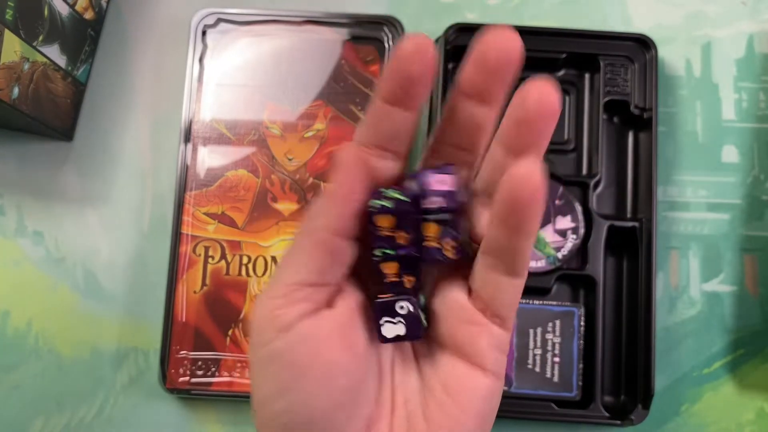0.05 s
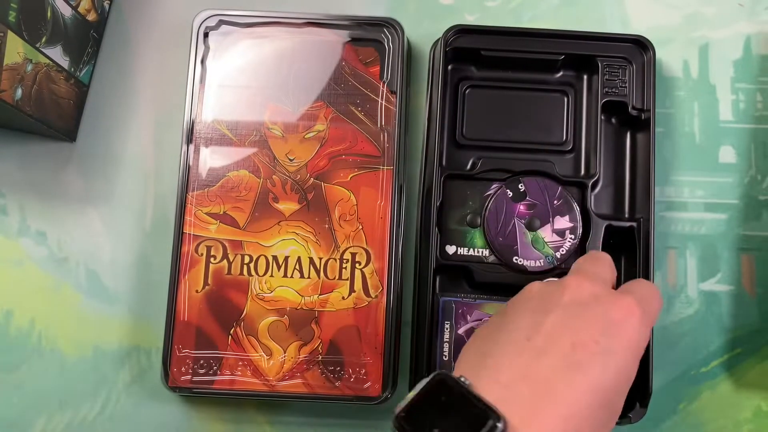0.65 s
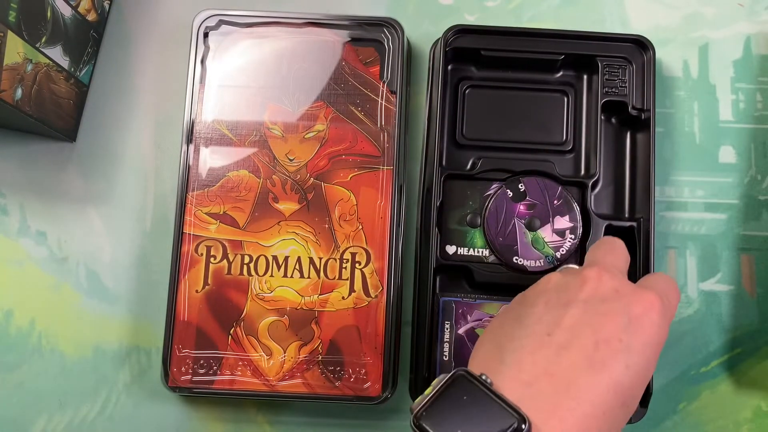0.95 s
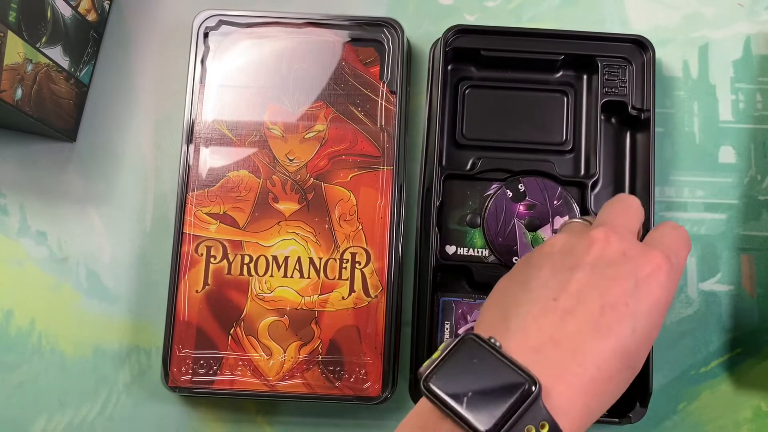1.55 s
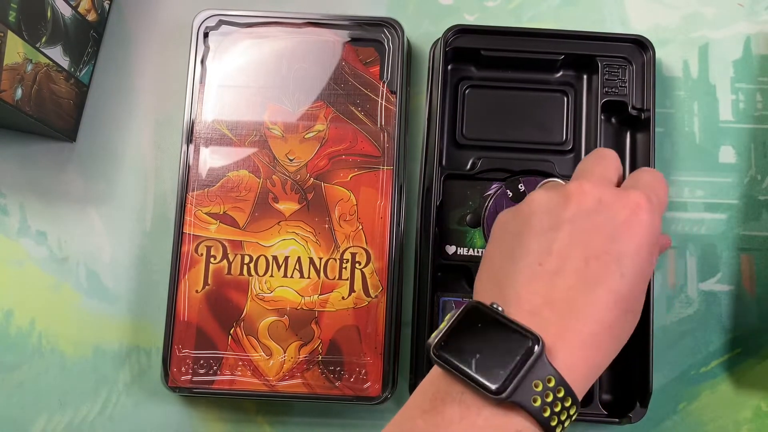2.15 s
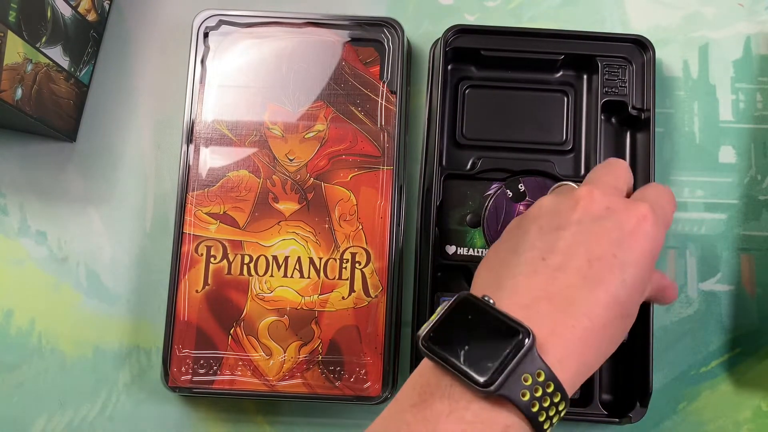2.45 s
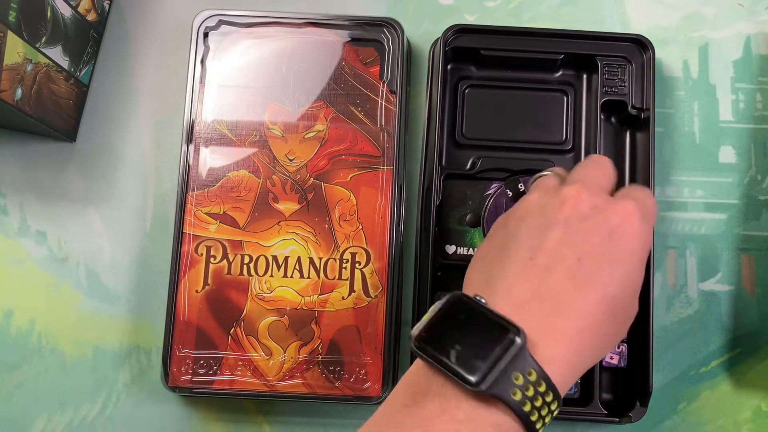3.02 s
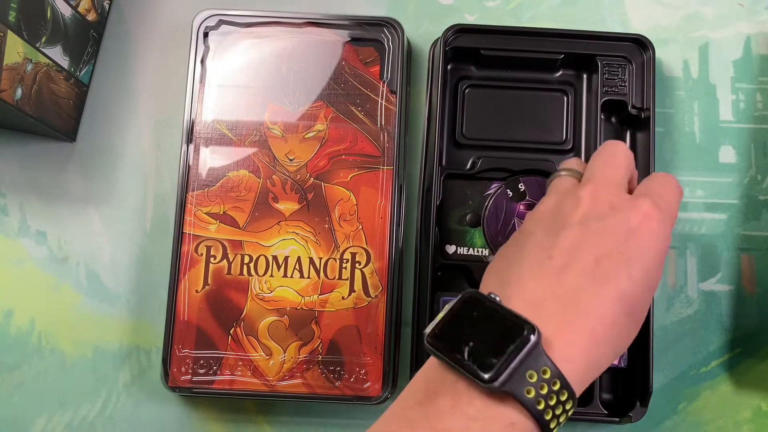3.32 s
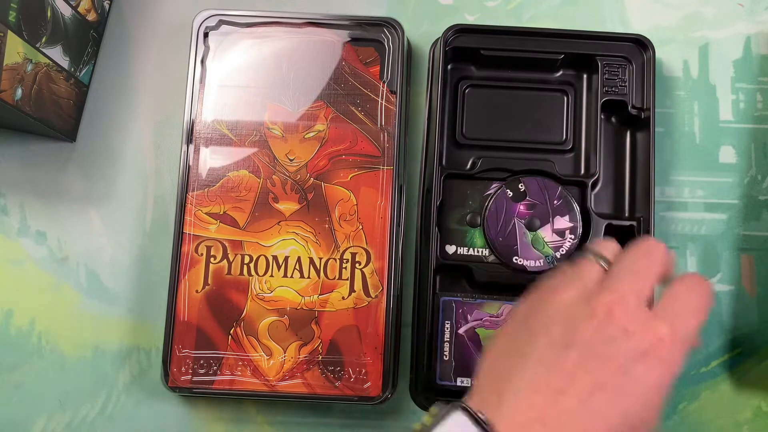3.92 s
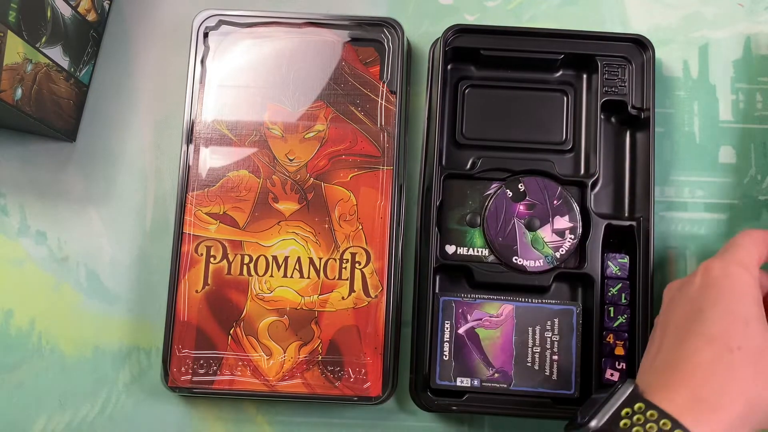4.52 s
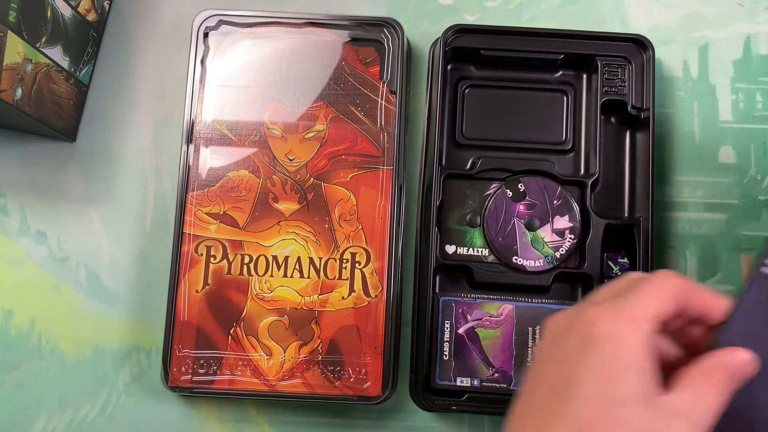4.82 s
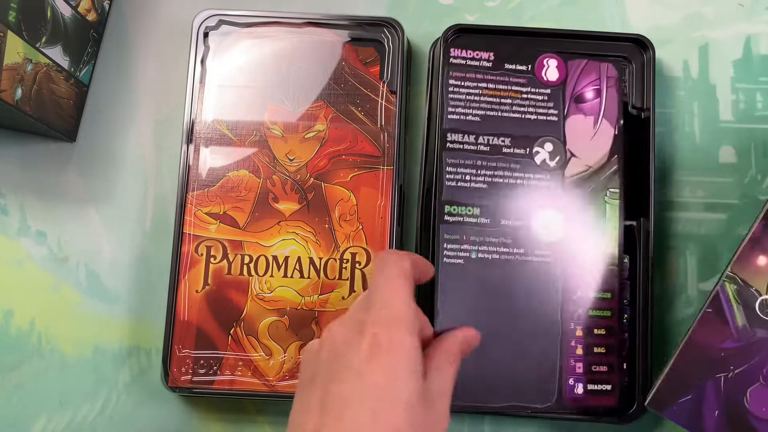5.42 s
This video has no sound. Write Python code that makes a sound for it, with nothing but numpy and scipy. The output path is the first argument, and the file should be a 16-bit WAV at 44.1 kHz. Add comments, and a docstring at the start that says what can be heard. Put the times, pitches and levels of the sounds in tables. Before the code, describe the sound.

Small plastic dice click together in a palm, then are dropped and pushed one by one into a thin plastic tray, with sharp clacks, rattles and light scrapes in uneven bursts. Near the end a stiff card slides off the table with a soft papery hiss and is laid on the tray with a few dull taps. It is heard from close above, in a small room with a low rumble and faint hum.

```python
"""First, plastic dice click together in a palm. Then they are dropped and pushed one by one into the slot
of a thin plastic tray, which clacks and rattles as they hit it and scrapes as fingers and dice rub along.
Near the end, a stiff card slides off the table with a papery hiss and is laid on top with a few dull taps.
All of it is heard from close above the table, in a small room with a low rumble and a faint hum."""
import sys
import numpy as np
from scipy import signal
from scipy.fft import rfft, irfft
from scipy.io import wavfile
from scipy.ndimage import uniform_filter1d

SR = 44100
rng = np.random.default_rng(int(sys.argv[2]) if len(sys.argv) > 2 else 0)


def master(y):
    """Save y as 16-bit WAV."""
    cut = np.clip(np.atleast_2d(y).T, -1, 1)
    pcm = np.round(cut * 32767)  # scale
    wavfile.write(sys.argv[1], SR, pcm.astype(np.int16))


N = 250047
TIME = np.arange(N) / SR
SINCE_HIT = TIME[:SR // 6]  # seconds since two things met
ONSET = SR // 125  # samples in the first moment of a hit

# Levels are relative. "Weight" turns a sound's bass up or down, and "hardness" its treble.
# How the room's rumble rises and falls: (time [s], level [dB])
RUMBLE_LEVELS = [(0.0, -63), (1.07, -61.5), (1.47, -57), (2.32, -63.5), (2.65, -64), (5.67, -56.5)]
# Tone of the rumble: (frequency [Hz], level [dB])
RUMBLE_SPECTRUM = [(12, 1), (25, 3), (42, -3), (75, -8.5), (110, -15), (170, -21), (400, -48)]
# Tone of the room's steady air: (frequency [Hz], level [dB])
AIR_SPECTRUM = [(60, -1.5), (130, -4.5), (250, 2.5), (450, -8.5), (1000, -12.5), (3500, -17), (8000, -23.5),
                (15500, -44)]
# First echoes off the table and near walls: (delay [s], level [dB])
EARLY_ECHOES = [(.0023, -19), (0.01, -15), (0.015, -26.5), (.0226, -22.5)]
# Soft bumps of hand and card that reach the table: (time [s], level [dB], pitch [Hz])
TABLE_THUMPS = [(1.389, -22.5, 336.3), (1.391, -31.5, 110), (5.008, -31, 69.5), (5.061, -29.5, 55),
                (5.145, -40, 238)]
# How the card's slide swells and fades: (time [s], level [dB])
SLIDE_LEVELS = [(4.47, -69), (4.51, -54.5), (4.56, -53.5), (4.66, -50), (4.75, -53), (4.83, -56.5),
                (4.89, -62)]
# Tone of the card: (frequency [Hz], level [dB])
CARD_SPECTRUM = [(180, -42.5), (300, -15), (584, -8), (701, -9.5), (801, -8), (1190, -10), (1300, -11),
                 (2360, -5), (3520, -6.5), (4300, -10.5), (12500, -16.5), (16000, -25.5)]
# Broad resonances of the sliding card: (frequency [Hz], width [Hz], level [dB])
CARD_RESONANCES = [(2450, 500, -4), (3600, 700, -4)]
# The card is touched or touches down: (time [s], level [dB], hardness [dB])
CARD_TAPS = [(4.2312, -42.5, -25), (4.9905, -46, 2.5), (5.0628, -46, -7.5), (5.1423, -47, -13.5),
             (5.2054, -41, -0.5), (5.2264, -43, -2.5), (5.25, -47.5, -6), (5.2984, -52.5, -19),
             (5.582, -47, -0.5), (5.6178, -44, -7)]
# Tone of the tray's many overlapping, quickly dying vibrations: (frequency [Hz], level [dB])
TRAY_SPECTRUM = [(70, -24.5), (120, -11.5), (165, -32.5), (205, -16.5), (310, -13), (420, -15.5),
                 (520, -7.5), (660, -3.5), (1100, -1.5), (1800, 1), (2800, -5.5), (4100, -9.5),
                 (5600, -10.5), (8600, -12), (11000, -18.5), (14800, -23.5), (16500, -32.5)]
# Pitches at which the tray rings with dice in it: (frequency [Hz], width [Hz], level [dB])
TRAY_RESONANCES = [(652, 420, -9.5), (790, 150, -4), (1030, 69, 4.5), (1340, 62, -3), (1530, 42, 7),
                   (1800, 37, -12), (2160, 44, -3.5), (2185, 33, -5.5), (2690, 400, 2), (3970, 300, -5),
                   (7000, 250, -13), (8500, 1200, -7)]
# Fingers, dice or card rub along the tray: (start [s], end [s], level [dB], hardness [dB])
TRAY_RUBS = [(0.636, 0.744, -62, -14), (0.852, 1.035, -63.5, -8.5), (1.046, 1.221, -41, -11),
             (1.375, 1.546, -42.5, -10), (1.528, 1.715, -43, -11), (1.95, 2.013, -54.5, -11),
             (2.235, 2.307, -65.5, 1.5), (2.473, 2.571, -59, 0.5), (2.738, 2.913, -45, -2.5),
             (3.249, 3.331, -42, -11.5), (3.425, 3.54, -51, -6), (3.535, 3.72, -60.5, -3.5),
             (3.814, 3.865, -72.5, 8.5), (4.163, 4.36, -64, -8), (4.844, 4.87, -56.5, 2.5),
             (4.931, 5.18, -59, -4.5), (5.204, 5.334, -59.5, -1.5), (5.329, 5.444, -59.5, -12.5),
             (5.413, 5.503, -53.5, -8), (5.55, 5.672, -49, -13)]
# One die hits another: (time [s], peak level [dB], pitch [Hz])
DICE_CLICKS = [(0.008, -16, 6900), (0.0153, -26, 7250), (0.0226, -24, 6200), (0.0418, -28.5, 6250),
               (0.0804, -25, 5400), (0.1203, -45, 4870), (0.1562, -31, 5140), (0.1726, -48, 4100),
               (0.2058, -29, 2950), (0.21, -29.5, 5300), (0.282, -44, 3570), (0.3169, -36, 4070),
               (0.498, -25, 6010), (0.5505, -45.5, 4330), (0.626, -42.5, 4020), (0.9656, -23.5, 6400),
               (1.2156, -22.5, 8900), (1.267, -14, 8580), (1.335, -16.5, 7620), (2.076, -49, 3300),
               (2.761, -21.5, 5850), (2.7809, -22, 5800)]
# A die hits the tray: (time [s], level [dB], pitch of the struck spot [Hz], weight [dB], hardness [dB])
DICE_KNOCKS = [(0.5946, -46.5, 980, 2, -11.5), (0.8435, -52.5, 930, 2, -15),
               (0.9921, -22, 2230, -6.5, -23.5), (1.004, -20, 1480, -6, -16), (1.0484, -25.5, 910, 0, -2.5),
               (1.0737, -30, 1490, -10, -11.5), (1.137, -32.5, 1350, 1, -5),
               (1.2556, -20.5, 2920, -2.5, -4), (1.281, -20.5, 2220, -2.5, -13),
               (1.3278, -42, 1000, 0.5, -3), (1.3432, -25, 2910, -2, -14), (1.3875, -20.5, 1660, -9, -5.5),
               (1.4577, -35, 2624, 0.5, -5.5), (1.525, -33.5, 1520, -10.5, 4.5),
               (1.529, -22, 1570, -11.5, -13.5), (1.5407, -31.5, 1620, 0.5, -5.5),
               (1.59, -30, 2520, -1, -4.5), (1.6408, -39.5, 1360, -2.5, -3.5),
               (1.759, -20, 1700, -3.5, -7.5), (1.8223, -25.5, 2230, -2.5, -11.5),
               (2.213, -59.5, 1730, -2.5, -6.5), (2.279, -49, 1535, -5.5, -8),
               (2.4756, -46, 2710, -4, -11.5), (2.5274, -49, 3900, -4, -5.5),
               (2.6094, -23.5, 2560, -1.5, -18.5), (2.6242, -29, 840, -4, -14), (2.647, -44, 2690, -8, 5),
               (2.6811, -41.5, 880, 0.5, -9), (2.735, -41.5, 1050, 2, -20), (2.7499, -31, 920, -3, -12),
               (2.8302, -39.5, 790, 4, -1), (2.9378, -44.5, 940, 0, -16), (3.1714, -20.5, 2900, -3.5, -9.5),
               (3.1926, -29, 1076, -1.5, -6), (3.2295, -24.5, 1520, -5, -13.5),
               (3.2523, -23.5, 1460, -3.5, -12), (3.5353, -51.5, 810, 7.5, -12),
               (3.593, -48.5, 3930, 0, -2.5)]


def from_db(db):
    """Turn decibels into a number to multiply by."""
    return 10 ** (np.asarray(db) / 20)


def rms_one(x, size=None):
    """Scale a sound so its average strength (rms) is 1, over the first size samples if given."""
    return x / np.sqrt(np.mean(x[:size] ** 2) + 1e-20)


def add(out, time_s, sound):
    """Mix a sound in at the given time."""
    at = max(round(time_s * SR), 0)
    out[at:at + len(sound)] += sound[:max(N - at, 0)]


def decay(t, t60):
    """A fade that falls 60 dB in t60 seconds."""
    return np.exp(-np.log(1000) * t / t60)


def coloured(x, spectrum):
    """Give a sound the tone of a spectrum table, without smearing it earlier (minimum phase)."""
    size = 8192
    hz, db = np.transpose(spectrum)
    bin_hz = np.arange(size // 2 + 1) * SR / size
    log_gain = np.log(from_db(np.interp(np.log(bin_hz + 1), np.log(hz), db)))
    cepstrum = irfft(log_gain)[:size // 2]
    cepstrum[1:] *= 2
    response = irfft(np.exp(rfft(cepstrum, size)))
    return signal.fftconvolve(x, response)[:len(x)]


def resonate(x, hz, width_hz):
    """Make a sound ring at one pitch; a narrower width rings longer."""
    r = np.exp(-np.pi * width_hz / SR)
    feedback = [1, -2 * r * np.cos(2 * np.pi * hz / SR), r * r]
    return signal.lfilter(np.array([1, 0, -1]) * (1 - r * r) / 2, feedback, x)


def keep_side(x, side, hz, order):
    """Keep the "low" or "high" side of a frequency; a higher order cuts more steeply."""
    return signal.sosfilt(signal.butter(order, min(hz, SR / 3), side, fs=SR, output="sos"), x)


def balance(x, weight_db, hardness_db, size=None):
    """Heavy contacts bring out an object's bass, hard ones its treble."""
    bands_hz = [(95, 950), (950, 4400), (4400, 17000)]
    filters = [signal.butter(3, band, "band", fs=SR, output="sos") for band in bands_hz]
    bass, middle, treble = (rms_one(signal.sosfilt(sos, x), size) for sos in filters)
    return from_db(weight_db) * bass + middle + from_db(hardness_db) * treble


def friction(size, slips_per_s, hiss_db, catch_db, spread_db=4):
    """Tiny uneven slips over a hiss; the surfaces catch and let go every few milliseconds."""
    slips = (rng.random(size) < slips_per_s / SR) * rng.choice([-1, 1], size)
    slips = slips * from_db(spread_db * rng.standard_normal(size))
    grip = rms_one(uniform_filter1d(rng.standard_normal(size), ONSET // 2))
    hiss = from_db(hiss_db) * rng.standard_normal(size)
    return (rms_one(slips) + hiss) * from_db(catch_db * grip)


def hit_force(bounce_db, bounce_s, chatter_t60, chatter_db, buzz_t60, buzz_db, grain_db=4, count=4):
    """One sharp push, quick rebounds on edges and corners, brief chatter, then a buzz of loose parts."""
    noise, grain = rng.standard_normal((2, len(SINCE_HIT)))
    chatter = from_db(chatter_db) * decay(SINCE_HIT, chatter_t60)
    buzz = from_db(buzz_db) * decay(SINCE_HIT, buzz_t60)
    force = rms_one(noise * from_db(grain_db * grain)) * (chatter + buzz)
    force[0] += 1
    rebounds = 1 + (rng.random(count) * bounce_s * SR).astype(int)
    force[rebounds] += from_db(bounce_db) * rng.choice([-1, 1], count)
    return force


def background(air_db=-70, hum_hz=113.0, hum_db=-75, rumble_boost_db=6):
    """The room's slowly changing rumble, faint hum and steady air."""
    rumble_noise, air_noise = rng.standard_normal((2, N))
    rumble_gain = from_db(rumble_boost_db + np.interp(TIME, *np.transpose(RUMBLE_LEVELS)))
    rumble = rumble_gain * rms_one(coloured(rumble_noise, RUMBLE_SPECTRUM))
    hum = from_db(hum_db) * np.sqrt(2) * np.sin(2 * np.pi * hum_hz * TIME)
    air = from_db(air_db) * rms_one(coloured(air_noise, AIR_SPECTRUM))
    return rumble + hum + air


def room(x, tail_t60=0.22, tail_db=-12, wall_hz=6000, build_s=0.0083):
    """The table and near walls echo first, then comes a short, duller tail."""
    t = TIME[:SR // 2]
    tail = rng.standard_normal(len(t)) * decay(t, tail_t60) * (1 - np.exp(-(t / build_s) ** 2))
    response = keep_side(from_db(tail_db) * tail / np.linalg.norm(tail), "low", wall_hz, order=1)
    for delay_s, db in EARLY_ECHOES:
        response[round(delay_s * SR)] += from_db(db)
    return x + signal.fftconvolve(x, response)[:N]


def table_thumps(t60=0.015, rise_s=0.0013):
    """A bump gives the table a low swing that dies almost at once."""
    out = np.zeros(N)
    envelope = decay(SINCE_HIT, t60) * (1 - np.exp(-SINCE_HIT / rise_s))
    for time_s, db, hz in TABLE_THUMPS:
        add(out, time_s, from_db(db) * np.sin(2 * np.pi * hz * SINCE_HIT) * envelope)
    return out


def card_slide():
    """Card on cloth makes a papery hiss; the sheet rings most where it moves fastest."""
    level = from_db(np.interp(TIME, *np.transpose(SLIDE_LEVELS), left=-120, right=-120))
    grain = friction(N, slips_per_s=2500, hiss_db=0, catch_db=1)
    hiss = rms_one(coloured(grain, CARD_SPECTRUM))
    sheet = sum(from_db(db) * resonate(hiss, hz, width) for hz, width, db in CARD_RESONANCES)
    speed = level / level.max()
    return level * (hiss + speed * sheet)


def card_taps(flap_hz=1250, flap_width_hz=900, flap_db=8):
    """The card lands flat with a short, dead slap; a softer touch sounds duller."""
    out = np.zeros(N)
    for time_s, db, hardness_db in CARD_TAPS:
        force = hit_force(bounce_db=-10, bounce_s=0.0049, chatter_t60=0.036, chatter_db=-10,
                          buzz_t60=0.066, buzz_db=-20)
        top_hz = 9000 * 2 ** (hardness_db / 8)  # an octave lower for every 8 dB softer
        slap = coloured(keep_side(force, "low", top_hz, order=2), CARD_SPECTRUM)
        flap = from_db(flap_db) * resonate(slap, flap_hz, flap_width_hz)
        add(out, time_s, from_db(db) * balance(slap + flap, 0, hardness_db, size=ONSET))
    return out


def tray(force, ring_db, spread_db=5):
    """A force makes the tray sound; each place it is touched brings out a different mix of pitches."""
    chances = rng.standard_normal((len(TRAY_RESONANCES), 2))
    ringing = sum(np.sign(sign) * from_db(db + spread_db * strength) * resonate(force, hz, width)
                  for (hz, width, db), (strength, sign) in zip(TRAY_RESONANCES, chances))
    return coloured(force, TRAY_SPECTRUM) + from_db(ring_db) * ringing


def jolts(size, gap_s=0.022, spread_db=3, count=40):
    """Small pushes from loose dice tipping against the tray's walls at uneven times."""
    at = (np.cumsum(rng.uniform(0.5, 1.5, count)) * gap_s * SR).astype(int)
    strength = from_db(spread_db * rng.standard_normal(count))
    force = np.zeros(size)
    force[at[at < size]] = strength[at < size]
    return force


def tray_rubs(taper=0.52, weight_db=-3.5, jolt_db=34, jolt_growth=0.38):
    """Each stroke swells and fades as it scrapes the tray; firmer ones jostle the dice more."""
    out = np.zeros(N)
    firmest_db = max(row[2] for row in TRAY_RUBS)
    for start_s, end_s, db, hardness_db in TRAY_RUBS:
        size = np.clip(round((end_s - start_s) * SR), ONSET, SR // 2)
        scrape = friction(SR // 2, slips_per_s=900, hiss_db=3, catch_db=2)
        rattle = from_db(jolt_db + jolt_growth * (db - firmest_db)) * jolts(SR // 2)
        body = tray(scrape + rattle, ring_db=-4.5)[:size]
        swell = signal.windows.tukey(size, taper)
        add(out, start_s, from_db(db) * swell * balance(body, weight_db, hardness_db))
    return out


def click(hz, scatter_db=-34, scatter_t60=0.065, ring_db=-2, hollow_db=-2, snap_db=-43):
    """Two hard cubes meet; the click scatters among the other dice, and hollows nearby ring briefly."""
    force = from_db(scatter_db) * rng.standard_normal(len(SINCE_HIT)) * decay(SINCE_HIT, scatter_t60)
    force[0] += 1
    tick = keep_side(force, "low", 1.38 * hz, order=5)  # how long they touch limits the treble
    tick = keep_side(tick, "high", 0.86 * hz, order=2)  # small things make little bass
    ring = resonate(tick, hz, width_hz=700)
    hollows_hz = 2700 * 2 ** rng.uniform(-0.96, 1, size=4)
    hollows = sum(resonate(tick, pitch, width_hz=350) for pitch in hollows_hz)
    snap = force - np.roll(force, 1)  # a corner catches first: faint and very bright
    sound = tick + from_db(ring_db) * ring + from_db(hollow_db) * hollows + from_db(snap_db) * snap
    return sound / np.abs(sound).max()


def dice_clicks(retouch_s=0.007, retouch_loss_db=9):
    """Dice click together and touch again, more weakly, a moment later."""
    out = np.zeros(N)
    gaps_s = retouch_s * rng.uniform(0.4, 1.3, len(DICE_CLICKS))
    for (time_s, db, hz), gap_s in zip(DICE_CLICKS, gaps_s):
        add(out, time_s, from_db(db) * click(hz))
        add(out, time_s + gap_s, from_db(db - retouch_loss_db) * click(hz))
    return out


def knock(db, hz, weight_db, hardness_db, spot_db=3, spot_growth=0.7, crack_db=-28,
          bass_db=-2, treble_db=-1):
    """One die hits the tray; the stronger the hit, the more the struck spot rings out."""
    loudest_db = max(row[1] for row in DICE_KNOCKS)
    force = hit_force(bounce_db=-4.5, bounce_s=0.003, chatter_t60=0.027, chatter_db=-19,
                      buzz_t60=0.14, buzz_db=-36)
    spot_gain = from_db(spot_db + spot_growth * (db - loudest_db))
    spot = spot_gain * resonate(coloured(force, TRAY_SPECTRUM), hz, width_hz=350)
    crack = from_db(crack_db) * np.diff(force, prepend=0)  # the die's hard corner, very bright
    body = tray(force, ring_db=-3) + spot + crack
    return from_db(db) * balance(body, weight_db + bass_db, hardness_db + treble_db, size=ONSET)


def dice_knocks(loose_above_db=-34, bounces=2, bounce_s=0.013, first_loss_db=15, next_loss_db=4.5,
                corner_treble_db=3):
    """Dice land on the tray; loose ones bounce on their corners, weaker each time."""
    out = np.zeros(N)
    all_gaps_s = bounce_s * rng.uniform(0.85, 1.15, (len(DICE_KNOCKS), bounces))
    for (time_s, db, hz, weight_db, hardness_db), gaps_s in zip(DICE_KNOCKS, all_gaps_s):
        add(out, time_s, knock(db, hz, weight_db, hardness_db))
        if db > loose_above_db:  # in lighter knocks the fingers hold the die
            for k, delay_s in enumerate(np.cumsum(gaps_s)):
                bounce_db = db - first_loss_db - k * next_loss_db
                add(out, time_s + delay_s, knock(bounce_db, hz, weight_db, hardness_db + corner_treble_db))
    return out


def scene(knock_db=1.5, rub_db=-1, slide_db=-4):
    """Everything on the table sounds into the same room, in one channel."""
    dice_and_tray = from_db(knock_db) * dice_knocks() + dice_clicks() + from_db(rub_db) * tray_rubs()
    card = from_db(slide_db) * card_slide() + card_taps()
    return (room(dice_and_tray + card + table_thumps()) + background())[None]


def record(dry):
    """Cut away the very highest treble, above 16200 Hz."""
    return signal.sosfilt(signal.ellip(10, 0.2, 80, 16200, fs=SR, output="sos"), dry)


dry = scene()
out = record(dry)
master(out)
```